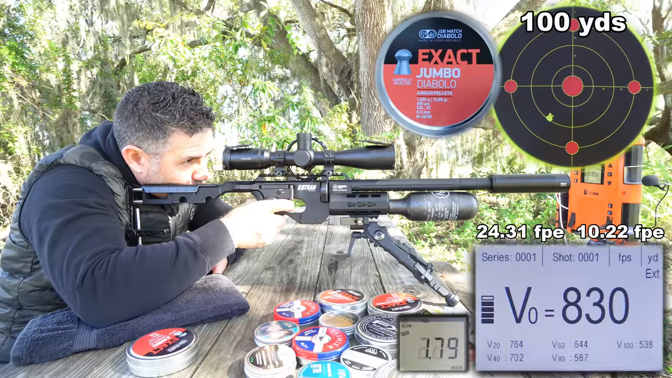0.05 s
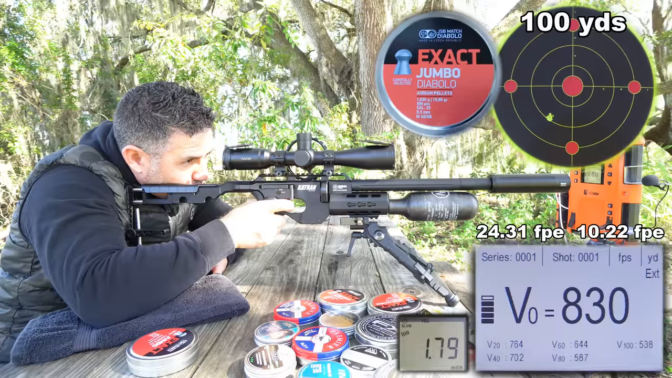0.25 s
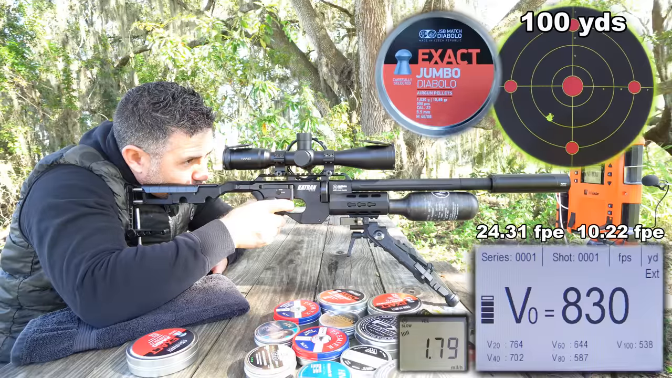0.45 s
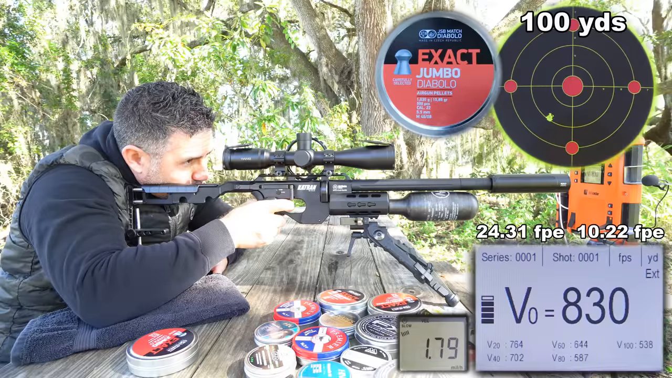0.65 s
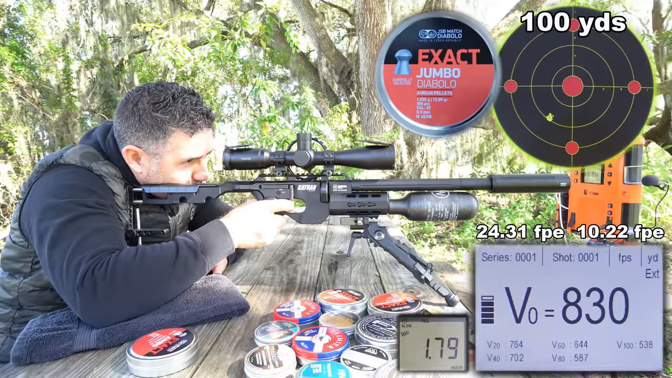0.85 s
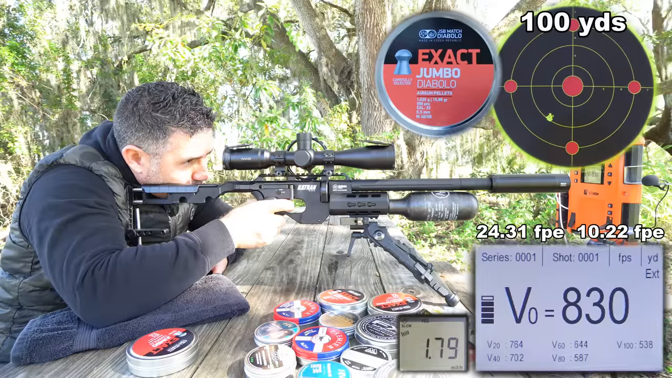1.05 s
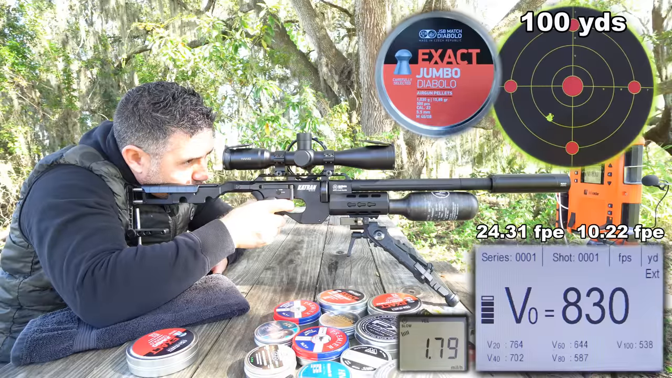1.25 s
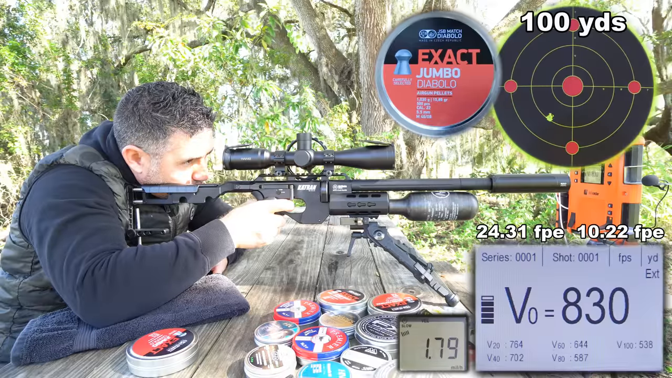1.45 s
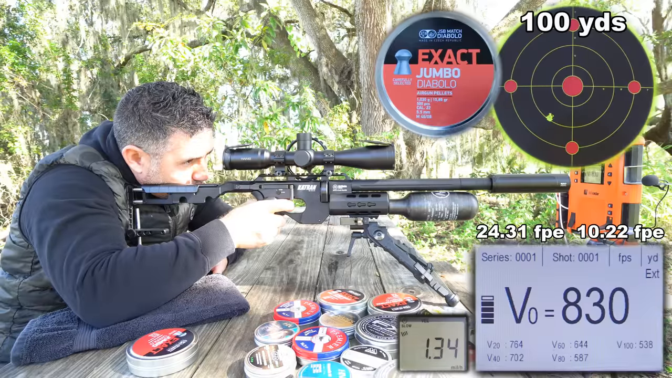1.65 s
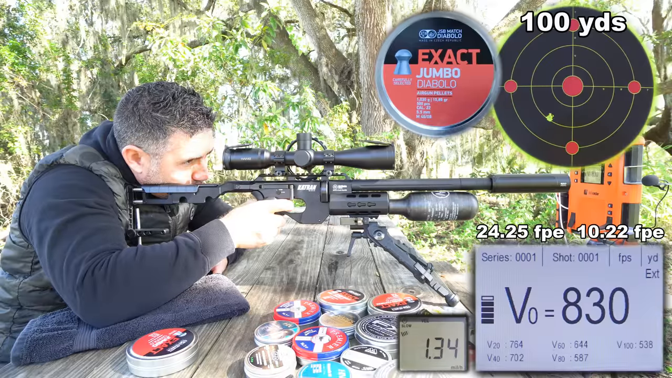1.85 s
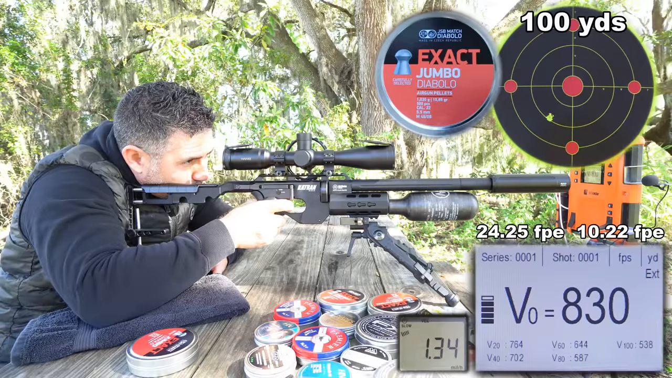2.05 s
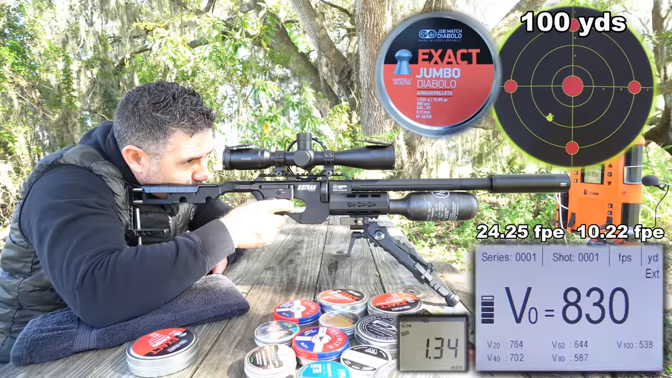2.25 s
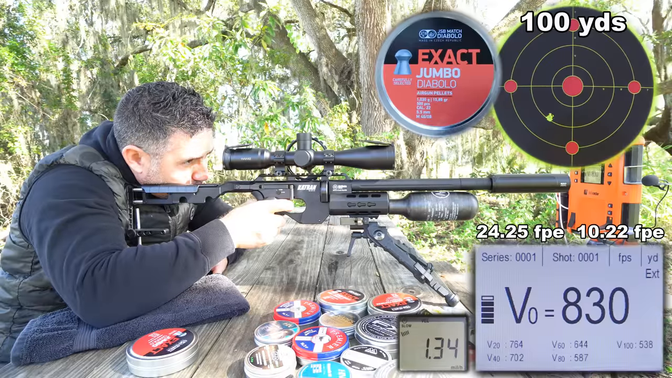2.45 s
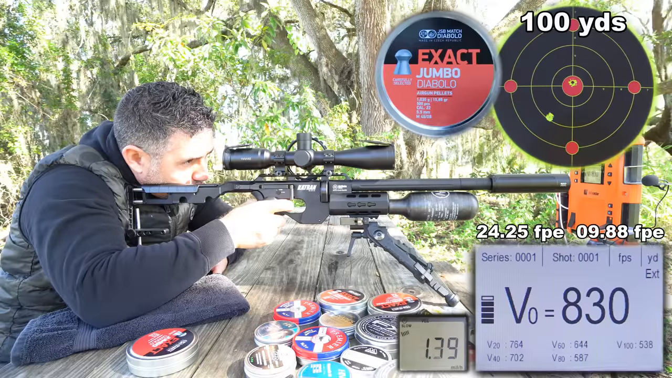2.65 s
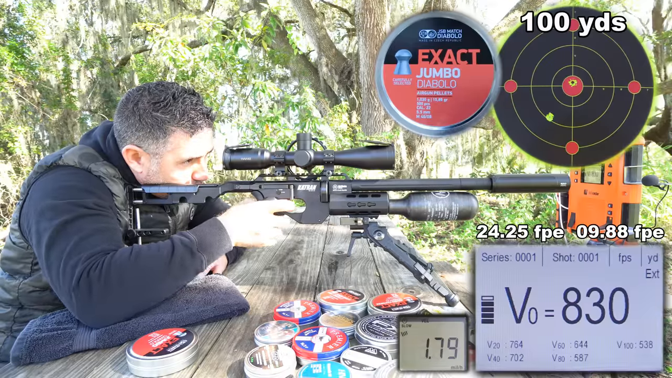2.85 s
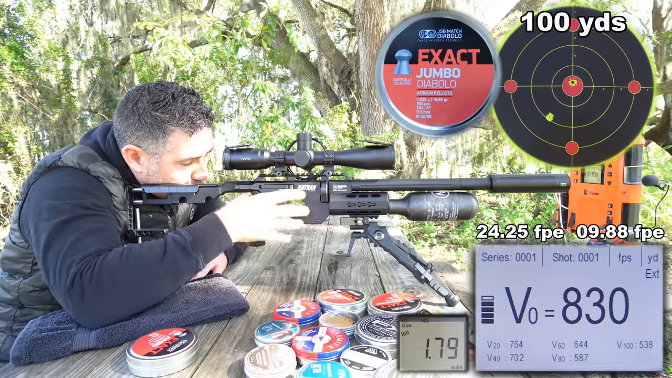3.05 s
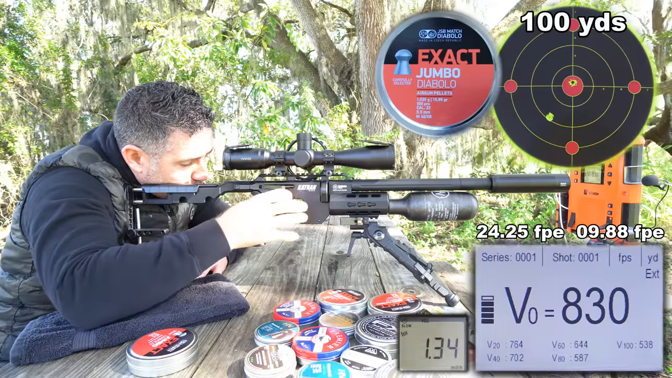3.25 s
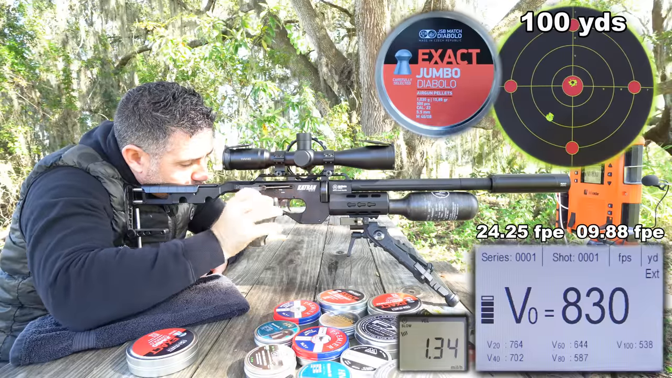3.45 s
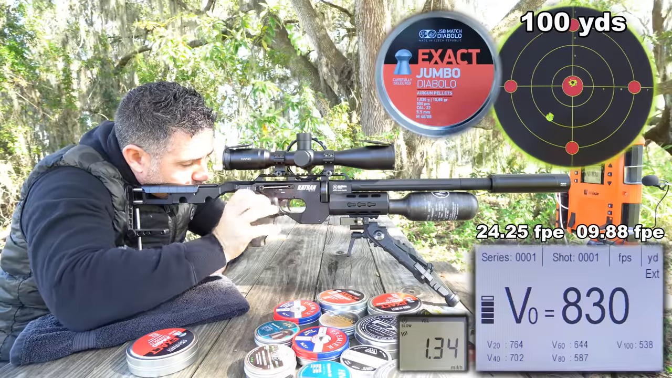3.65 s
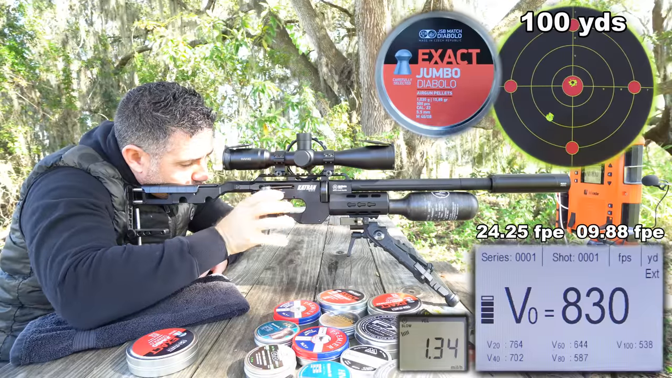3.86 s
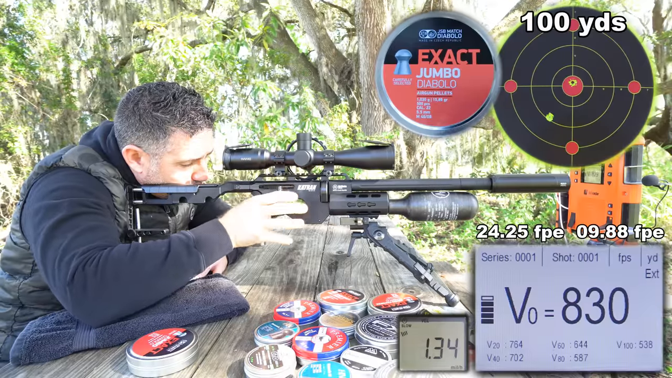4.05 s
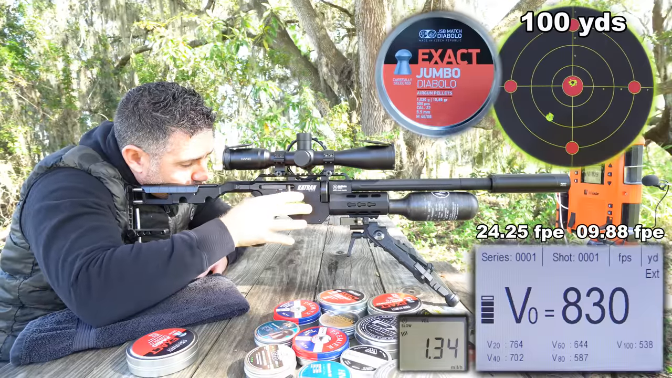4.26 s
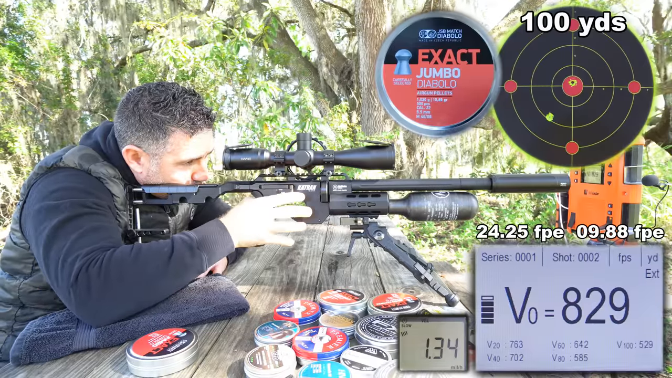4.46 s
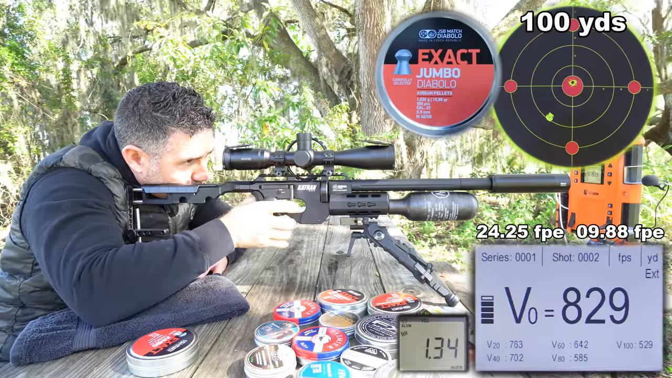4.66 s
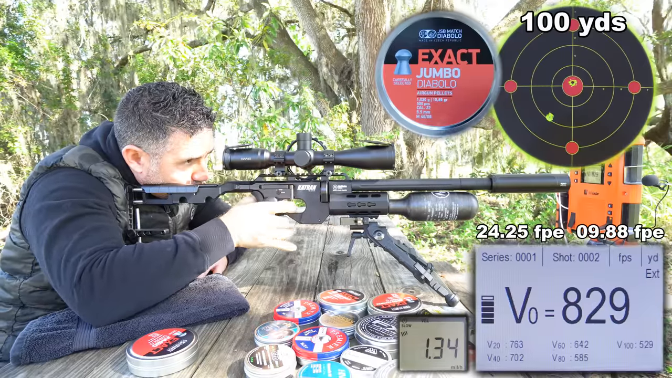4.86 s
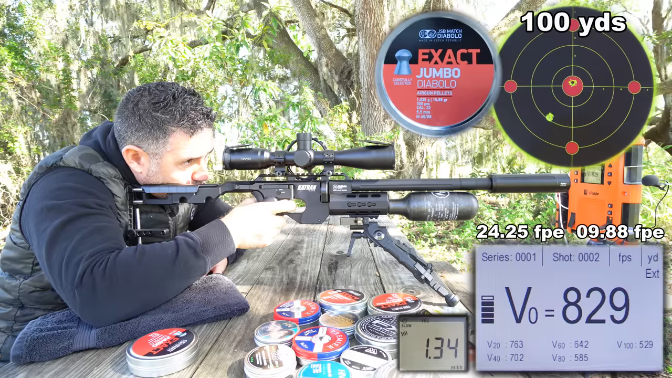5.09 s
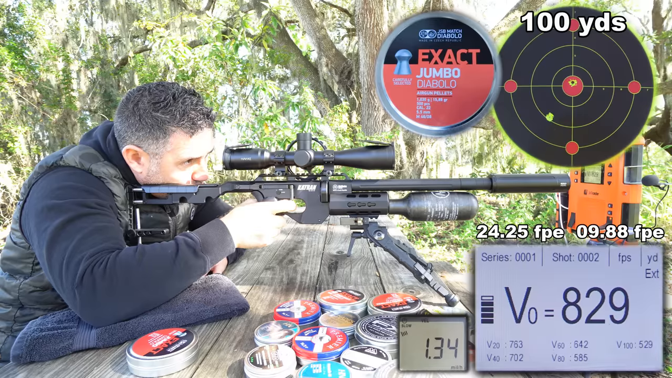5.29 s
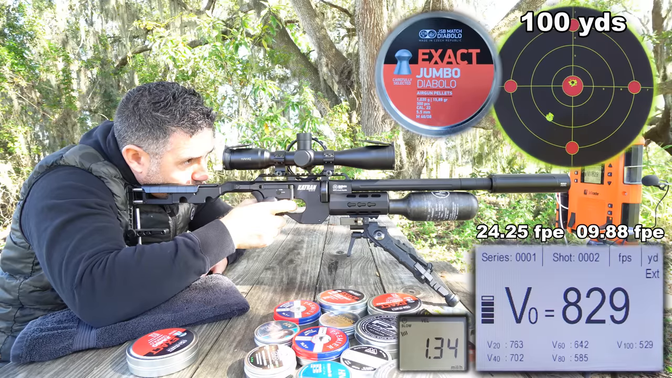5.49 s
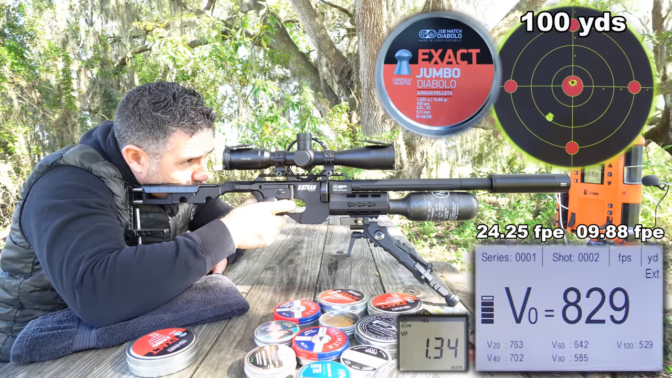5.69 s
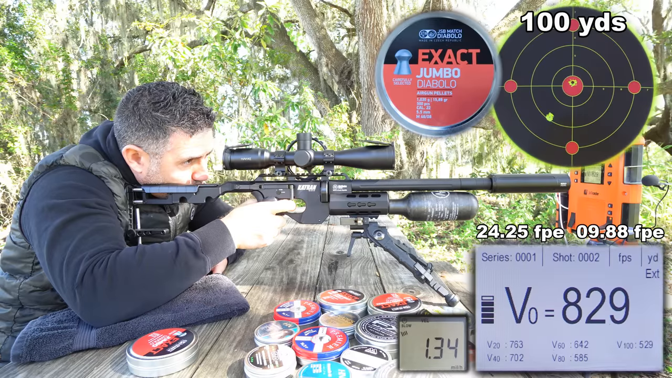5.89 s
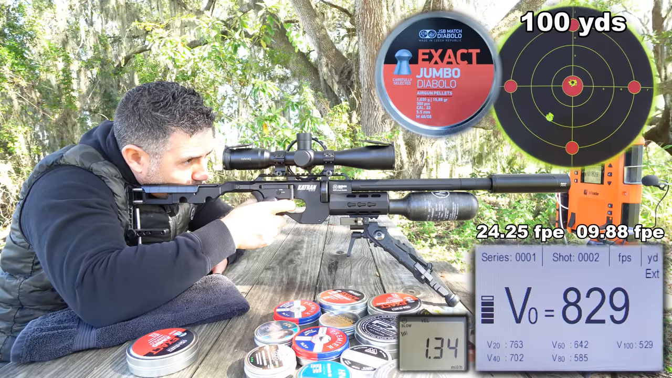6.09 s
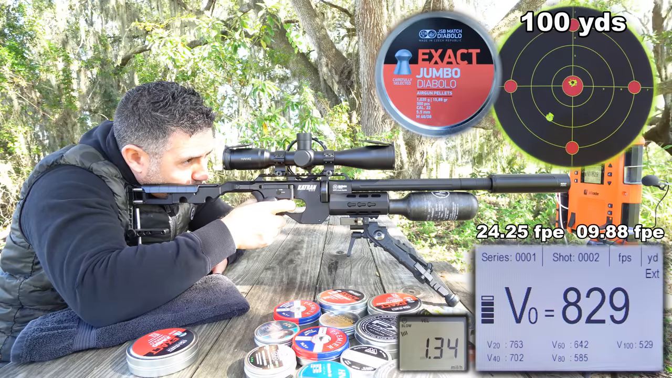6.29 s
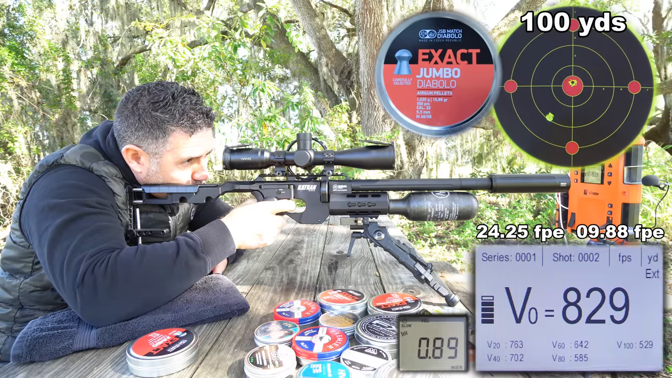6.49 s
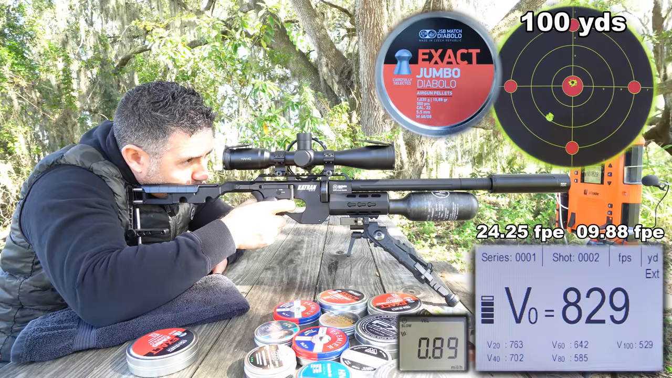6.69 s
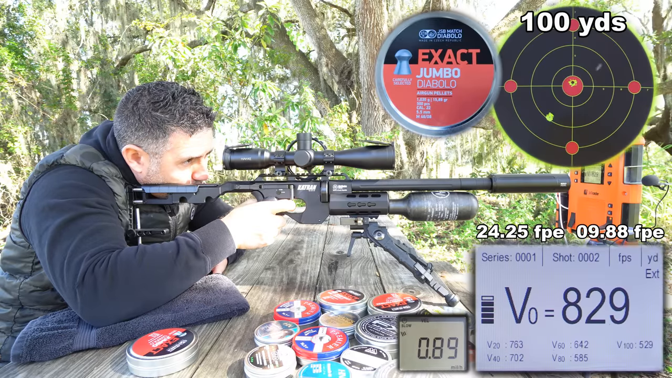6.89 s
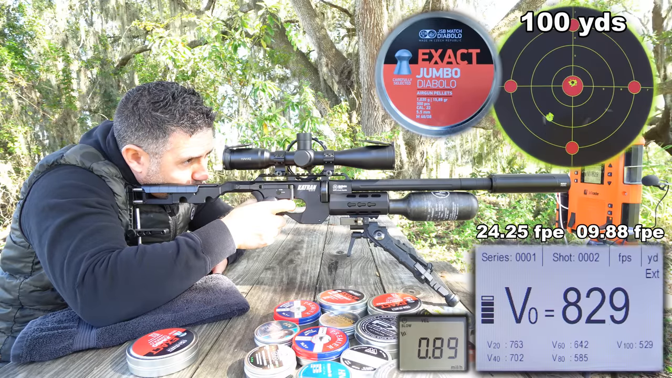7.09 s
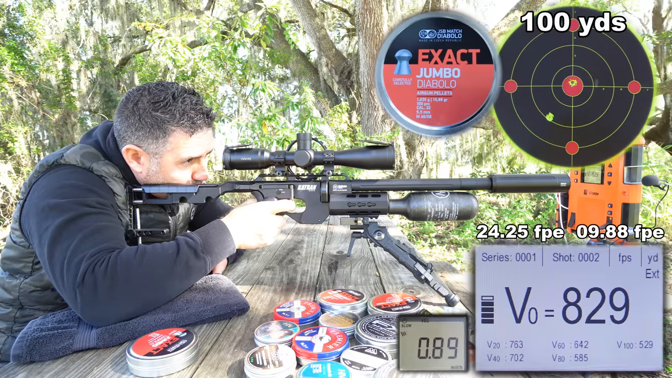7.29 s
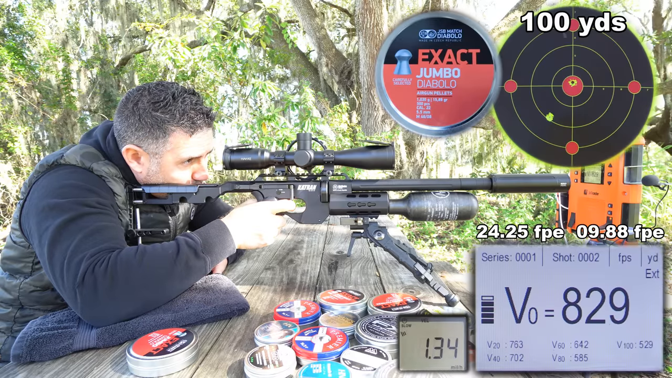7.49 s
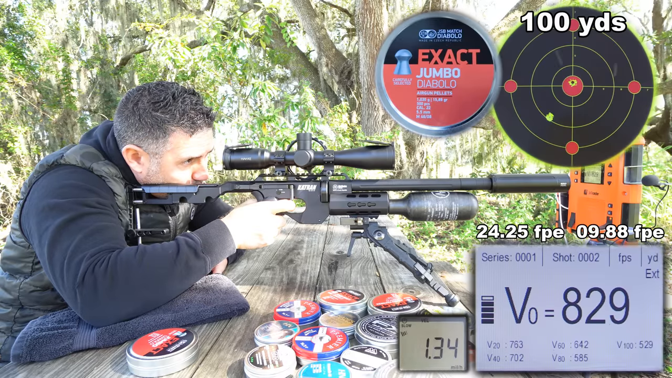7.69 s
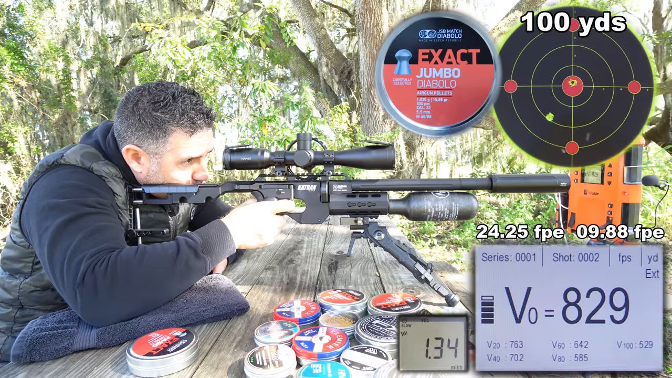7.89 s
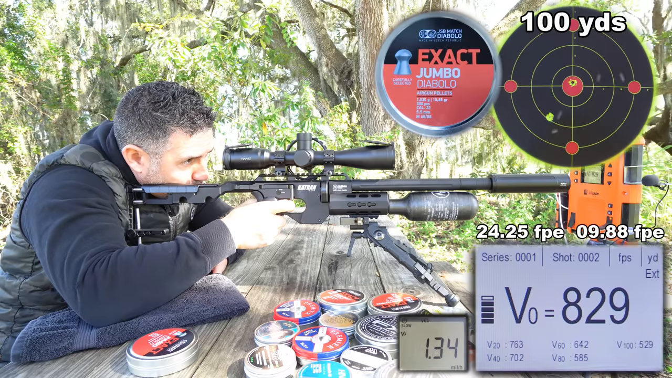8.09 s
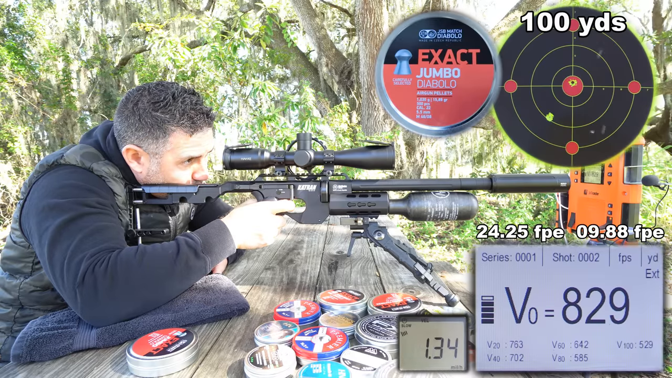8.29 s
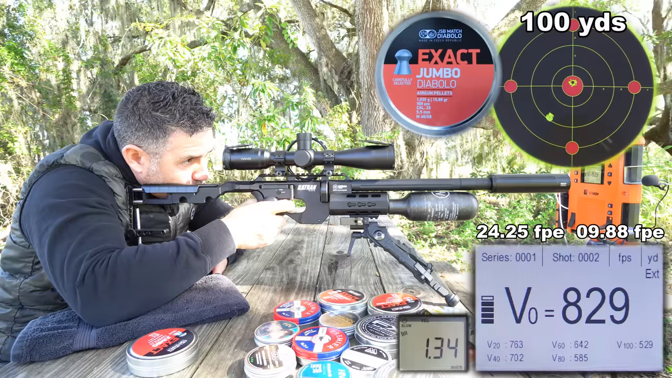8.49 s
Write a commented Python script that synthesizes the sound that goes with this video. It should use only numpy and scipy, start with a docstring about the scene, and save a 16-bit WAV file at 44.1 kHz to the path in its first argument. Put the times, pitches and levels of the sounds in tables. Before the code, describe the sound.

Close to the shooter at the edge of a wood, a single pressurised-air shot bursts and dies quickly. A second microphone at the target catches the pellet's short hiss and dry smack. The side lever is then worked in crisp, uneven metallic clicks with a faint squeak, ending in a firm clack. Soft rumble continues, with chirps, a thin mew and faint far-off caws.

```python
"""At the edge of a wood, a pre-charged air rifle on a wooden table fires one shot: a jet of noise and modes.
The pellet, noise rising as the inverse of distance, hisses up to a microphone by the far target and smacks in.
The side lever is cycled: noise cracks and ringing steel, and a faint gliding squeak between the clicks.
Small birds chip in rising tones, a thin bird mews and a crow caws far off in resonated harmonics. Far cracks and
soft thuds are heard. A road hums in filtered noise, and the electronics whine in a swooping tone."""
import sys
import numpy as np
from scipy import signal
from scipy.fft import rfft, irfft, next_fast_len
from scipy.io import wavfile

SR = 44100
rng = np.random.default_rng(int(sys.argv[2]) if len(sys.argv) > 2 else 0)


def bounce(signal):
    """Save signal as a 16-bit WAV file at the path given by the first command-line argument."""
    frames = np.transpose(np.atleast_2d(signal))
    limited = np.clip(frames, -1, 1)
    pcm = np.round(limited * 32767).astype(np.int16)
    wavfile.write(sys.argv[1], SR, pcm)


N = 376613
T = np.arange(N) / SR
TOP_HZ = 16000

# Spectrum of low outdoor air noise. Each row: frequency in Hz, relative level in dB.
AIR_COLOUR = [(12, -38), (20, -10.5), (69, -2.5), (124, -4.5), (293, -16), (377, -20), (407, -26.5),
              (439, -16), (474, -20.5), (827, -25.5), (988, -26.5), (1440, -28), (1560, -30.5),
              (3170, -42.5), (8500, -64), (11000, -74.5), (18700, -120)]
# Weightings of that spectrum for road rumble and for still air. Each row: frequency in Hz, gain in dB.
RUMBLE_WEIGHTING = [(60, -1.5), (140, 1), (220, 2.5), (420, -16), (1200, -41)]
STILL_AIR_WEIGHTING = [(120, -26.5), (300, -2.5)]
# Spectrum of the steady high hiss. Each row: frequency in Hz, relative level in dB.
HISS_COLOUR = [(3000, -2.5), (7000, -1.5), (9200, 0), (11000, -5.5), (13000, -7), (16000, -14)]
# Surges of the rumble. Each row: middle in seconds, half length in seconds, rise in dB.
RUMBLE_SURGES = [(1.6, .17, 5), (3.1, .2, 2), (5.12, .22, 3.5), (6.28, .1, 3), (7.1, .35, 3),
                 (8.05, .15, 2.5)]
# Spectrum of the roar of tyres. Each row: frequency in Hz, relative level in dB.
ROAR_COLOUR = [(100, -15), (220, 3), (330, -8), (600, -5), (900, -9), (1300, -11), (2000, -19), (3200, -33),
               (7000, -42), (16000, -70)]
# Tyres singing up. Each row: middle in seconds, half length in seconds, pitch in Hz, level in dB.
TYRE_SWELLS = [(.25, .17, 435, -65), (.85, .3, 435, -68), (.65, .48, 865, -64.5), (3.0, .25, 850, -62.5),
               (3.05, .4, 435, -68), (4.67, .2, 435, -64), (5.1, .17, 385, -69), (6.95, .22, 440, -71)]
# Chips of a small bird. Each row: start in seconds, relative level in dB, start pitch in Hz, top pitch in Hz.
BIRD_CHIPS = [(0.36, -52.5, 5900, 7950), (3.590, -56.5, 5870, 8000), (6.278, -54, 5530, 8220),
              (8.399, -54.5, 5900, 7960)]
# Soft low thuds. Each row: start in seconds, relative level in dB.
THUDS = [(1.092, -40), (1.297, -43), (5.2, -45.5), (7.975, -48)]
# Modes of one thud. Each row: frequency in Hz, relative level in dB, 60 dB decay time in seconds.
THUD_MODES = [(48, -0.5, 0.24), (125, -6, .12), (186, -2, 0.082)]
# Spectrum of the air jet. Each row: frequency in Hz, relative level in dB.
JET_COLOUR = [(59, -47), (100, -17), (302, -6.5), (481, -12), (595, -6), (991, -12.5), (1250, -5.5),
              (1650, -8.5), (2040, -4), (3190, -9.5), (3470, -6), (6290, -0.5), (14400, -12),
              (16000, -18.5)]
# Spectrum of the wood's answer to the shot. Each row: frequency in Hz, relative level in dB.
WOOD_COLOUR = [(60, -30), (200, -4), (380, -11), (550, -8.5), (1300, -8), (1700, -7), (5000, -4.5),
               (9000, -4), (12500, -11), (16000, -17)]
# Decay of scatter from the trees. Each row: frequency in Hz, 60 dB decay time in seconds.
WOOD_T60 = [(150, 0.19), (1000, .38), (3000, .44), (6000, .4), (10000, .31), (15000, 0.2)]
# The muzzle's pressure pulse. Each row: frequency in Hz, relative level in dB, 60 dB decay time in seconds.
MUZZLE_MODES = [(433, -2.5, .022), (740, -6.5, 0.019), (1485, -3, 0.013), (264, -11, 0.033),
                (130, -32, .08)]
# Barrel, air bottle and action. Each row: frequency in Hz, relative level in dB, 60 dB decay time in seconds.
STEEL_MODES = [(1512, -6, .2), (1940, -7, .25), (2170, -5, .25), (2900, -3, 0.15), (3300, -4, .25),
               (3637, 2.5, 0.19), (4160, -5.5, 0.18), (4950, -3.5, .24), (4870, -2.5, .3),
               (5540, 0.5, 0.18), (5736, -7, 0.35), (6073, -4, .4), (6467, 3.5, 0.17), (6940, -3.5, .2),
               (6960, -2, .22), (7557, -4.5, .3), (7741, -14, .7), (8043, -7, .32), (8897, -1, .18),
               (9100, 4.5, 0.091), (10400, -2.5, .09)]
# Far cracks back through the trees. Each row: start in seconds, level in dB, 60 dB decay time in seconds.
FAR_CRACKS = [(2.437, -54, 0.13), (2.449, -54.5, 0.38), (2.5705, -43, 0.045), (2.726, -56.5, 0.35),
              (2.878, -58.5, 0.14), (5.015, -60.5, 0.22), (5.098, -63, 0.06), (5.305, -70, .1),
              (5.848, -69, .06), (6.02, -56, 0.15)]
# Spectrum of those cracks. Each row: frequency in Hz, relative level in dB.
FAR_COLOUR = [(300, -8.5), (1200, -5), (2200, -0.5), (5000, -2.5), (8000, -14.5), (10000, -17), (15000, -29)]
# Spectrum of the pellet's hiss. Each row: frequency in Hz, relative level in dB.
PELLET_COLOUR = [(120, -28.5), (200, 1.5), (482, -10.5), (671, -6), (1770, -15), (3310, -5.5), (5040, -9),
                 (8740, -8.5), (13100, -10.5), (16000, -16.5)]
# Modes of the target board. Each row: frequency in Hz, relative level in dB, 60 dB decay time in seconds.
BOARD_MODES = [(650, -5, 0.0084), (980, -2, .009), (1587, -7, 0.0095), (2400, -1, .005), (2850, -2.5, .007),
               (3540, -10, .006), (4594, -2.5, .006), (6040, -7, .006)]
# Spectra of the board shaking in its frame and of the wood's answer. Each row: frequency in Hz, level in dB.
SHAKE_COLOUR = [(60, -12), (220, 5), (400, -4), (700, 2), (1500, -7.5), (4500, -6), (9000, -17), (16000, -25)]
HIT_WOOD_COLOUR = [(200, -4), (1000, 0.5), (2500, -1.5), (5000, -4.5), (9000, -13.5), (15000, -28)]
# Contacts of trigger, lever, magazine and latch. Each row: start in seconds, relative level in dB, hard treble
# in dB, hollow middle in dB, relative level of the knock on the stock in dB, count of contacts.
STEEL_CONTACTS = [(2.934, -51.5, -3.5, 6, -22, 1), (3.149, -57, -11, 3, -25, 1),
                  (3.259, -42.5, -8, 24, -14, 1), (3.265, -42, 1, 7, -15, 3), (3.306, -46, -3, 5, -20, 3),
                  (3.3462, -25, 12, -6, -33, 1), (3.462, -25, -1, -7, -30, 1),
                  (3.477, -46, 3.5, -1, -17, 1), (3.494, -41, 7, 0, -21, 2), (3.5118, -29, 7, -2, -25, 2),
                  (3.5226, -28, 6, -5.5, -16, 1), (3.6846, -44, 1, 2, -12, 1),
                  (3.689, -31.5, 2, -4, -21, 1), (3.7505, -41, .5, -3.5, -12, 1),
                  (3.8312, -39.5, 18, -3, -15, 1), (3.845, -39, 4, -8, -18, 2),
                  (3.8703, -45.5, 12, -2, -30, 1), (3.8904, -52, 1.5, -3, -17, 1),
                  (3.906, -51.5, 11.5, -2, -16, 1), (3.942, -50, -14.5, 3, -20, 1),
                  (3.960, -51, 6, -1, -18, 1), (3.991, -36.5, -12, -2.5, -22, 1),
                  (4.043, -28.5, -2.5, 4, -42, 1), (4.219, -36.5, -5, -2, -22, 2),
                  (4.2332, -41, -7.5, 13, -6, 1), (4.3558, -39, 3, 8, -26, 1), (4.3602, -15, 2, 3, -19, 1),
                  (4.394, -48, -17, 6, -11, 2), (4.501, -59, -14.5, 17, -15, 1)]
# Spectrum common to clicks and rubbing. Each row: frequency in Hz, relative level in dB.
CLICK_COLOUR = [(180, -37), (300, -19.5), (519, -9), (994, -17.5), (1870, -1), (2650, -7.5), (3030, -4),
                (4090, -7), (4520, -2), (6300, -7), (6850, -15.5), (7950, -9), (9090, -16), (10000, -17),
                (16000, -35)]
# Modes of the stock. Each row: frequency in Hz, relative level in dB, 60 dB decay time in seconds.
STOCK_MODES = [(390, -6.5, 0.1), (556, -2, 0.066), (265, -7, 0.067)]
# The breech as it locks. Each row: frequency in Hz, relative level in dB, 60 dB decay time in seconds.
BREECH_MODES = [(340, -15, .15), (800, -6.5, .07), (1184, -2.5, 0.022), (1490, 5, .025), (1840, 8, 0.0224),
                (2130, -4, .028), (5000, -29, 0.2026), (5736, -35, 0.65), (9496, -13, 0.061),
                (10400, -9, .045)]
# Strokes of bolt and magazine. Each row: start in seconds, hold in seconds, relative level in dB.
STROKES = [(3.25, .19, -63), (3.45, .085, -55), (3.675, .006, -55), (3.835, .025, -53), (3.965, .02, -58),
           (4.02, .05, -62), (4.21, .025, -59)]
# Caws of a crow. Each row: start in seconds, relative level in dB.
CROW_CAWS = [(6.21, -61.5), (6.537, -61.5), (6.868, -62), (7.198, -61)]

# Road: starting rumble level and its ebb; the drones and roar hold, then recede.
RUMBLE_START_DB, RUMBLE_EBB_DB_PER_S = -54.3, .62
DRONE_DB, LOW_DRONE_DB, ROAR_DB = -68.5, -72, -69
RECEDE_S, RECEDE_DB_PER_S = 3.7, 5.5
TYRE_WIDTH_SHARE = .17  # bandwidth over pitch
# Air leaving the muzzle: a leak as the valve opens, the main blast, then the moderator empties.
SHOT_S, LEAK_S, LEAK_DB = 1.8462, .0075, -25
BLAST_DB, BLAST_ATTACK_S, BLAST_HOLD_S, BLAST_T60_S = -7.3, .0015, .0052, .016
MODERATOR_DB, MODERATOR_HOLD_S, MODERATOR_T60_S = -16, .029, .066
# The pellet passes the microphone just before it lands; its hiss carries over the last metres only.
PASS_S, HIT_S, PELLET_M_PER_S, MISS_M = 2.618, 2.6403, 162, .7
HISS_DB, HISS_RANGE_M = -32.5, 18
# A loose part meets again after a short gap, a little weaker each time.
CHATTER_GAP_S, CHATTER_STEP_DB, CLICK_T60_S = .0078, -1.5, .02
LATCH_S = 4.361
STROKE_ATTACK_S, STROKE_T60_S = .01, .1
# The mew starts sharp, and its pitch sags and settles.
MEW_S, MEW_DB, MEW_ATTACK_S, MEW_HOLD_S, MEW_T60_S = 6.46, -82.5, .04, .35, 1.1
MEW_SETTLED_HZ, MEW_SAG_HZ, MEW_SAG_S = 812, 125, .08


def amp(db):
    """Convert decibels to amplitude gain."""
    return 10 ** (np.asarray(db) / 20)


def unit(x):
    """Normalise the mean power: scale to rms 1."""
    return x / np.sqrt(np.mean(x ** 2))


def fade(t, t60):
    """Exponential decay: 60 dB in t60 seconds."""
    return amp(-60 * t / np.maximum(t60, 1e-3))


def span(seconds):
    """Time axis of a short event."""
    return T[:int(seconds * SR)]


def add(out, s, x):
    """Superpose x on out from s seconds on."""
    i = int(s * SR)
    out[i:i + len(x)] += x[:len(out) - i]


def at_hz(points, hz):
    """Interpolate (Hz, value) points on a logarithmic frequency axis."""
    f, v = np.transpose(points)
    return np.interp(np.log(hz + 1), np.log(f), v)


def noise(gain, size):
    """Filtered white noise: rms 1, with the spectrum gain(Hz)."""
    n = next_fast_len(size)
    spectrum = rfft(rng.standard_normal(n)) * gain(np.fft.rfftfreq(n, 1 / SR))
    return unit(irfft(spectrum, n)[:size])


def coloured(points, size):
    """Noise of rms 1 with a spectrum through (Hz, dB) points."""
    return noise(lambda f: amp(at_hz(points, f)), size)


def peak(f, hz, width_hz):
    """Resonance: gain 1 at hz, falling on either side."""
    return 1 / (1 + (2 * (f - hz) / width_hz) ** 2)


def ring(modes, t, scatter_db=0):
    """Modal superposition: decaying sines of alternate sign, their strengths scattered from blow to blow."""
    luck = amp(scatter_db * rng.standard_normal(len(modes)))
    out = np.zeros(len(t))
    for k, (hz, db, t60) in enumerate(modes):
        out += (-1) ** k * luck[k] * amp(db) * np.sin(2 * np.pi * hz * t) * fade(t, t60)
    return out


def trees(x, t60, delay_s):
    """Diffuse scattering: trunks and leaves convolve a sound with a decaying noise tail of unit energy."""
    t = span(.8)
    tail = rng.standard_normal(len(t)) * fade(t, t60) * (1 - np.exp(-t / delay_s))
    return signal.fftconvolve(x, tail / np.linalg.norm(tail))[:N]


def held(start_s, attack_s, hold_s, t60):
    """Envelope: linear rise, steady hold and exponential decay."""
    t = T - start_s
    return np.clip(t / attack_s, 0, 1) * fade(np.maximum(t - attack_s - hold_s, 0), t60)


def bump(middle_s, half_s):
    """Gaussian rise and fall around one moment."""
    return np.exp(-((T - middle_s) / half_s) ** 2)


def tyres():
    """Broadband roar and two resonant drones of distant tyres recede; narrow bands sing up now and then."""
    out = amp(ROAR_DB) * coloured(ROAR_COLOUR, N)
    out += amp(DRONE_DB) * noise(lambda f: peak(f, 860, 200), N)
    out += amp(LOW_DRONE_DB) * noise(lambda f: peak(f, 435, 80), N)
    out *= amp(-RECEDE_DB_PER_S * np.maximum(T - RECEDE_S, 0))
    for s, half_s, hz, db in TYRE_SWELLS:
        out += amp(db) * bump(s, half_s) * noise(lambda f: peak(f, hz, TYRE_WIDTH_SHARE * hz), N)
    return out


def background(air_db=-67.8, hiss_db=-78.2):
    """Stationary noise of still air and hiss underlies distant tyres and a rumble whose level surges and ebbs."""
    surge_db = sum(db * bump(s, half_s) for s, half_s, db in RUMBLE_SURGES)
    rumble = noise(lambda f: amp(at_hz(AIR_COLOUR, f) + at_hz(RUMBLE_WEIGHTING, f)), N)
    out = amp(RUMBLE_START_DB - RUMBLE_EBB_DB_PER_S * T + surge_db) * rumble
    out += amp(air_db) * noise(lambda f: amp(at_hz(AIR_COLOUR, f) + at_hz(STILL_AIR_WEIGHTING, f)), N)
    return out + tyres() + amp(hiss_db) * coloured(HISS_COLOUR, N)


def whine(sweep_db=-67.5, steady_db=-80, supply_hz=61.025):
    """Frequency modulation: an electronic whistle swoops once per supply cycle, over a steady narrow band."""
    u = np.minimum((T * supply_hz + .5) % 1 / .7, 1)  # the sweep fills 70 % of a cycle, then is silent
    hz = np.interp(u, [0, .2, .45, .65, 1], [9700, 10000, 10300, 10100, 9050])
    jitter_hz = 25 * noise(lambda f: peak(f, 9, 74), N)
    phase = 2 * np.pi * np.cumsum(hz + jitter_hz) / SR
    sweep = np.sqrt(np.abs(np.sin(np.pi * u))) * np.sin(phase)
    return amp(sweep_db) * sweep + amp(steady_db) * noise(lambda f: peak(f, 9900, 700), N)


def chips(length_s=0.028, wood_db=0, overtone_db=-27):
    """Frequency glides: quick rising whistles with a weak second harmonic, prolonged by scattering in the trees."""
    out, t = np.zeros(N), span(length_s)
    u = t / length_s
    for s, db, start_hz, top_hz in BIRD_CHIPS:
        waver_hz = 170 * noise(lambda f: peak(f, 300, 500), len(t))
        hz = start_hz + (top_hz - start_hz) * np.sin(1.3 * u) + waver_hz
        phase = 2 * np.pi * np.cumsum(hz) / SR
        tone = np.sin(phase) + amp(overtone_db) * np.sin(2 * phase)
        add(out, s, amp(db) * np.sqrt(np.sin(np.pi * u)) * tone)
    return amp(-1.5) * out + amp(wood_db) * trees(out, t60=0.34, delay_s=0.0036)


def thuds():
    """Low damped modes: dull bumps with a softened onset."""
    out, t = np.zeros(N), span(.3)
    for s, db in THUDS:
        add(out, s, amp(db) * ring(THUD_MODES, t, scatter_db=2) * (1 - np.exp(-t / .004)))
    return out


def jet():
    """Power addition: the strength of escaping air from leak, blast and moderator."""
    leak = amp(LEAK_DB) * held(SHOT_S - LEAK_S, LEAK_S, 0, BLAST_T60_S) ** 2
    blast = amp(BLAST_DB) * held(SHOT_S, BLAST_ATTACK_S, BLAST_HOLD_S, BLAST_T60_S)
    moderator = amp(MODERATOR_DB) * held(SHOT_S, BLAST_ATTACK_S, MODERATOR_HOLD_S, MODERATOR_T60_S)
    return np.sqrt(leak ** 2 + blast ** 2 + moderator ** 2)


def shot(thump_db=-2, steel_db=-41, wood_db=-19.0):
    """Jet noise and a pressure pulse with ringing steel; the wood answers with frequency-dependent decay."""
    out = jet() * coloured(JET_COLOUR, N)
    t = span(.7)
    scatter = rfft(coloured(WOOD_COLOUR, len(t)))
    hz = np.fft.rfftfreq(len(t), 1 / SR)
    band = np.round(np.log(hz + 100) / .2)
    wood = np.zeros(len(t))
    for b in np.unique(band):  # each band decays at its own rate
        t60 = at_hz(WOOD_T60, hz[band == b].mean())
        wood += irfft(scatter * (band == b), len(t)) * fade(t, t60)
    add(out, SHOT_S, amp(wood_db) * wood * (1 - np.exp(-t / 0.015)))
    add(out, SHOT_S, amp(steel_db) * ring(STEEL_MODES, t) - amp(thump_db) * ring(MUZZLE_MODES, t))
    return out


def far_cracks():
    """Distant propagation: sharp sounds dulled in spectrum and smeared into decaying noise."""
    out, t = np.zeros(N), span(.5)
    for s, db, t60 in FAR_CRACKS:
        add(out, s, amp(db) * coloured(FAR_COLOUR, len(t)) * fade(t, t60))
    return out


def flight():
    """Inverse-distance law: strength of the pellet's hiss, limited in range and ended by the hit."""
    metres = np.hypot(PELLET_M_PER_S * (T - PASS_S), MISS_M)
    in_range = np.exp(-(metres / HISS_RANGE_M) ** 4)
    return amp(HISS_DB) * MISS_M / metres * in_range * (T < HIT_S)


def pellet(hit_db=1, crack_db=-11, crack_t60=.006, flex_hz=235, flex_db=-11.5, flex_t60=.028,
           shake_db=-28, shake_t60=.08, wood_db=-54, wood_t60=1.0):
    """Impact excitation: after its hiss the pellet rings the board, which shakes on; the wood answers dully."""
    t = span(.6)
    crack = amp(crack_db) * rng.standard_normal(len(t)) * fade(t, crack_t60)
    smack = ring(BOARD_MODES, t) + ring([(flex_hz, flex_db, flex_t60)], t) + crack
    # a small board radiates no deep bass
    smack = signal.sosfilt(signal.butter(2, 170, "high", fs=SR, output="sos"), smack)
    shake = coloured(SHAKE_COLOUR, len(t)) * fade(t, shake_t60)
    wood = coloured(HIT_WOOD_COLOUR, len(t)) * fade(t, wood_t60)
    out = flight() * coloured(PELLET_COLOUR, N)
    add(out, HIT_S, amp(hit_db) * smack + amp(shake_db) * shake + amp(wood_db) * wood)
    add(out, HIT_S + .0023, amp(-15) * smack)  # reflection off the ground
    return out


def flyby(width_s=.006, near_hz=11500, away_hz=3200, db=-35):
    """Falling pitch of a passing source: a fluttering zip glides down as the pellet passes the microphone."""
    u = (T - PASS_S) / width_s
    hz = away_hz + (near_hz - away_hz) * (1 - np.tanh(u)) / 2
    flutter = noise(lambda f: peak(f, 0, 3000), N)
    return amp(db) * np.exp(-(u / 1.3) ** 2) * flutter * np.sin(2 * np.pi * np.cumsum(hz) / SR)


def lever(breech_db=-30, steel_db=-38, steel_t60=.1, wood_db=-31):
    """Contact excitation: meeting steel cracks, rings and knocks the stock; the breech locks; trees scatter."""
    out, t = np.zeros(N), span(.15)
    for s, db, treble_db, middle_db, knock_db, count in STEEL_CONTACTS:
        contact = [(900, 0), (1800, middle_db), (4000, 0), (10000, treble_db)]
        for k in range(round(count)):
            crack = noise(lambda f: amp(at_hz(CLICK_COLOUR, f) + at_hz(contact, f)), len(t))
            crack *= fade(np.maximum(t - .0015, 0), CLICK_T60_S) * np.minimum(t / 0.00058, 1)
            # the hand damps the action
            steel = amp(steel_db) * ring(STEEL_MODES, t, scatter_db=4) * fade(t, steel_t60)
            knock = amp(knock_db) * ring(STOCK_MODES, t)
            add(out, s + k * CHATTER_GAP_S, amp(db + k * CHATTER_STEP_DB) * (crack + steel + knock))
    wood = amp(wood_db) * trees(out, t60=.45, delay_s=.012)
    add(out, LATCH_S, amp(breech_db) * ring(BREECH_MODES, span(.5)))
    return out + wood


def sliding(grain_db=5.0, ticks_per_s=30, tick_db=6, tick_t60=.022):
    """Dry friction: steel rubs in uneven grains during each stroke and catches at random in faint ticks."""
    rubbing = sum(amp(db) * held(s, STROKE_ATTACK_S, hold_s, STROKE_T60_S) for s, hold_s, db in STROKES)
    grains = unit(amp(grain_db * noise(lambda f: peak(f, 0, 490), N)))
    catches = rng.random(N) < ticks_per_s / SR
    ticks = signal.fftconvolve(catches, fade(span(.05), tick_t60))[:N]
    return rubbing * (grains + amp(tick_db) * ticks) * coloured(CLICK_COLOUR, N) * amp(-2)


def squeak(hz=1770, fall_hz=70, db=-70, waver_hz=20):
    """Nearly pure tone: one faint, whistling squeak sinks slightly, wavers and fades slowly."""
    out, t = np.zeros(N), span(.24)
    u = t / t[-1]
    pitch = hz - fall_hz * u + waver_hz * noise(lambda f: peak(f, 0, 200), len(t))
    tone = np.sin(2 * np.pi * np.cumsum(pitch) / SR)
    add(out, 4.105, amp(db) * np.sin(np.pi * u ** .7) * tone)
    return out


def throat(hz, formant_hz, width_hz, rough):
    """Source and filter: harmonics 2 to 7 of a shaky pitch pass through one resonance."""
    shake = noise(lambda f: peak(f, 59, 180), len(hz))
    phase = 2 * np.pi * np.cumsum(hz * (1 + rough * shake)) / SR
    return unit(sum(peak(k * hz, formant_hz, width_hz) * np.sin(k * phase) for k in range(2, 8)))


def callers(caw_s=.135, low_hz=265, high_hz=372, formant_hz=1440, width_hz=390, flutter_db=2.5, caw_echo_db=-6):
    """Formant calls: four arched, hoarse caws and one long mew waver over the distance, mixed with echoes."""
    mew_hz = MEW_SETTLED_HZ + MEW_SAG_HZ * np.exp(-np.maximum(T - MEW_S, 0) / MEW_SAG_S)
    mew = throat(mew_hz, formant_hz=3450, width_hz=2700, rough=.022)
    mew *= amp(MEW_DB) * held(MEW_S, MEW_ATTACK_S, MEW_HOLD_S, MEW_T60_S)
    caws = np.zeros(N)
    arch = np.sin(np.pi * (span(caw_s) / caw_s) ** .85)  # a quick rise and a longer droop
    for s, db in CROW_CAWS:
        caw = throat(low_hz + (high_hz - low_hz) * arch, formant_hz, width_hz, rough=.014)
        add(caws, s, amp(db) * np.sqrt(arch) * caw)
    flutter = unit(amp(flutter_db * noise(lambda f: peak(f, 0, 51), N)))
    echo = trees(amp(caw_echo_db) * caws + mew, t60=.65, delay_s=.02)
    return flutter * (caws + mew / 2) + echo


def scene():
    """Linear superposition of the rifle, its pellet and the wood around them."""
    gun = shot() + pellet() + flyby() + lever() + sliding()
    birds = chips() + callers()
    return (gun + squeak() + birds + far_cracks() + thuds() + background() + whine())[None]


def record(dry):
    """Overload and band limit: peaks beyond full scale are clipped, then a steep low-pass cuts the top."""
    low_pass = signal.ellip(10, .1, 70, TOP_HZ, fs=SR, output="sos")
    return signal.sosfilt(low_pass, np.clip(dry, -1, 1))


dry = scene()
out = record(dry)
bounce(out)
```